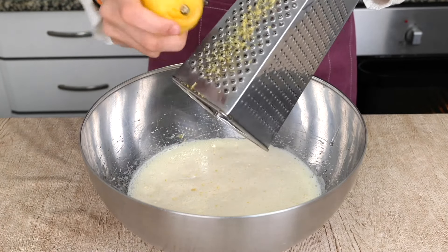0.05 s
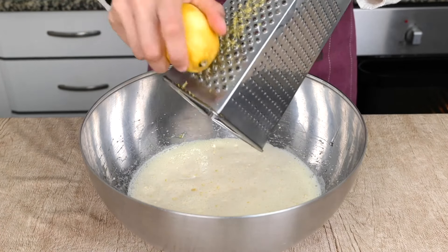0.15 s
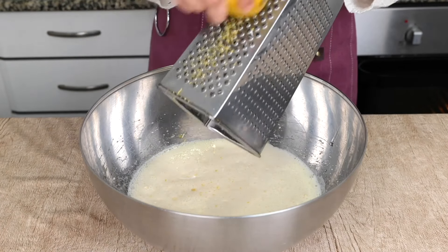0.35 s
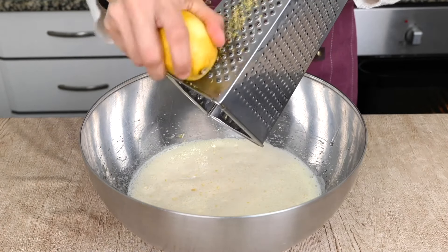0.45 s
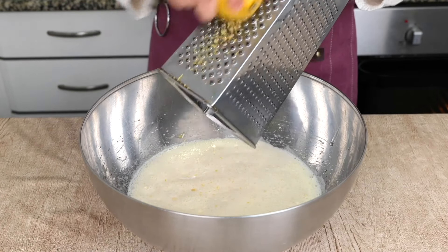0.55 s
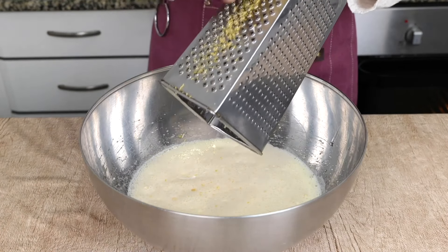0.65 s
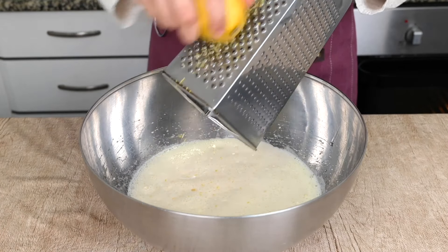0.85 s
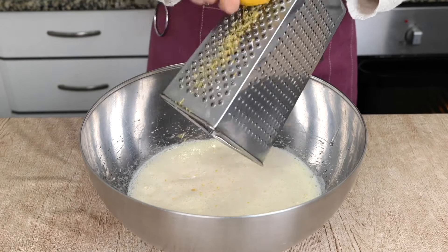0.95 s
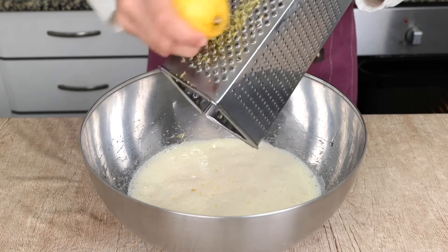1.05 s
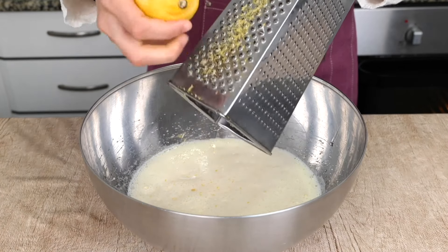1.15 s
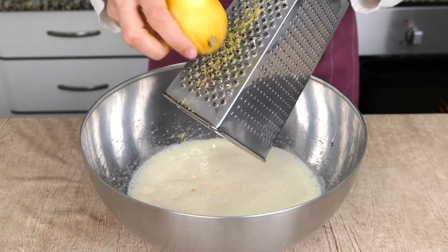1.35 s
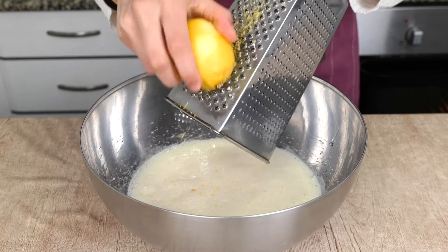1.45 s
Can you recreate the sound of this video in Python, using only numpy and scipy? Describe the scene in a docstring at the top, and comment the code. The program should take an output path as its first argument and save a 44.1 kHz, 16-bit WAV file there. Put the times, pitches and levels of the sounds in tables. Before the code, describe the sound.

A lemon rasps up and down a metal box grater in five quick strokes.

```python
"""Grating lemon peel

A lemon is rubbed five times up and down a steel box grater held over a bowl in a kitchen; lighter
brushes come before and after. The teeth tear the peel in dense tiny snaps, impulses that rasp and
drive the steel's modes. The handling rumbles, an appliance drones behind, and all of it is heard
on the left side, through a hissing microphone and a noise suppressor."""
import sys
import numpy as np
from scipy import signal
from scipy.fft import rfft, irfft
from scipy.io import wavfile
from scipy.ndimage import uniform_filter1d

SR = 44100
rng = np.random.default_rng(int(sys.argv[2]) if len(sys.argv) > 2 else 0)


def transcribe(u):
    """Save the signal u as a 16-bit wav file named by the first command-line argument.

    u: samples, shape (n,) or (channels, n), limited to [-1, 1]; the rate is SR.
    q: integer samples, one column per channel.
    """
    v = np.clip(np.atleast_2d(u).T, -1, 1)
    q = np.round(v * 32767).astype(np.int16)
    wavfile.write(sys.argv[1], SR, q)


N = 66150
T = np.arange(N) / SR


def grater():
    """Source and filter: friction scales one train of snaps, which excites every part of the steel."""
    force = friction()
    peel, sheet, box, rim = force * snaps()
    return rasp(peel, force[0]) + body(sheet, box) + teeth(peel) + steel_modes(sheet, box, rim)


def friction():
    """Power addition: arched strokes and brief brushes sum to envelopes for rasp, sheet, box and rim."""
    # strokes of the lemon (start [s], rise [s], fall [s], rasp [dB], sheet [dB], box [dB], rim [dB])
    strokes = [(0.232, 0.049, 0.089, -0.5, 1, 3, -10), (0.378, 0.074, 0.066, -2, 2, 4.5, -9),
               (0.541, .058, 0.087, 0.5, 2.5, 4.5, -6), (0.701, 0.081, 0.059, -1.5, 1.5, 6, 4),
               (0.854, 0.053, 0.093, -0.5, 3.5, 6, 5.5)]
    # light brushes (start [s], hold [s], decay [s], rasp [dB], sheet [dB], box [dB], rim [dB])
    brushes = [(0.205, 0.0061, 0.14, -23.5, -16.5, -4, -18), (1.097, 0.016, 0.02, -21.5, -12.5, -5, -10),
               (1.455, 0.02, 0.047, -21, -14, -3.5, -2.5)]
    leave_at_s, leave_decay_s, brush_rise_s = 1.0174, 0.03, 0.0031
    touch = np.clip((T - strokes[0][0]) / strokes[0][1], 0, 1)
    contact = touch * np.exp(-np.maximum(T - leave_at_s, 0) / leave_decay_s)
    power = (amp(-11.5) * contact) ** 2  # friction that remains at the turns
    for start, rise, fall, *levels in strokes:
        phase = np.interp(T, [start, start + rise, start + rise + fall], [0, np.pi / 2, np.pi])
        power = power + (amp(levels)[:, None] * np.sin(phase)) ** 2
    for start, hold, decay, *levels in brushes:
        onset = np.clip((T - start) / brush_rise_s, 0, 1)
        flick = onset * np.exp(-np.maximum(T - start - hold, 0) / decay)
        power = power + (amp(levels)[:, None] * flick) ** 2
    return np.sqrt(power)


def snaps(per_second=9000):
    """Shot noise: the peel tears in random impulses, uneven in size and clumped as rows of teeth bite."""
    spread_db = 2 * np.minimum(rng.exponential(1, N), 3)
    clump_db = 1.25 * np.clip(wander(seconds=0.012), -2, 2)
    return amp(spread_db + clump_db) * rng.choice([-1, 1], N) * (rng.random(N) < per_second / SR)


def rasp(peel, force):
    """Nonlinear excitation: the snaps are heard directly, and a harder bite adds a brighter fizz."""
    # dry rasp of the peel (frequency [Hz], spectral level [dB])
    rasp_spectrum = [(50, -55.5), (300, -35.5), (1000, -17.5), (2500, -6.5), (3900, -6), (5200, -4),
                     (6300, -1.5), (7400, -2.5), (8700, 0.5), (10000, -5), (11500, -7.5), (12800, -30.5),
                     (15500, -55)]
    # fizz of a hard bite (frequency [Hz], spectral level [dB])
    fizz_spectrum = [(1000, -52), (9000, -14.5), (11500, 2.5), (13000, 5.5), (15500, -15)]
    fizz = amp(-50) * unit(colour(peel * force ** 0.8, fizz_spectrum))
    return amp(-33.5) * unit(colour(peel, rasp_spectrum)) + fizz


def body(sheet, box):
    """Modal overlap: crowded resonances merge into the ring of the sheet and the thud of the box."""
    # dense ring of the thin sheet (frequency [Hz], spectral level [dB])
    sheet_spectrum = [(60, -42.5), (220, -23.5), (330, -8), (560, -12.5), (820, -10), (1200, 1),
                      (1750, 0.5), (2150, 1.5), (2450, -6), (2850, 0.5), (3500, -6.5), (6000, -1.5),
                      (9000, -14), (13000, -37.5)]
    # hollow thud of the box (frequency [Hz], spectral level [dB])
    box_spectrum = [(150, -33.5), (240, -15), (305, 0), (370, -0.5), (450, -15), (800, -15), (1500, -29.5)]
    sheet_ring = amp(-33) * unit(colour(shimmer(sheet), sheet_spectrum))
    return sheet_ring + amp(-48.5) * unit(colour(shimmer(box), box_spectrum))


def shimmer(drive, patches=8, t60_s=0.055):
    """Superposition: each patch of steel answers its own snaps with its own short, dense ring."""
    patch, t = rng.integers(0, patches, N), T[:SR // 4]
    decay = amp(-60 * t / t60_s)
    return sum(ring(drive * (patch == k), rng.standard_normal(len(t)) * decay) for k in range(patches))


def steel_modes(sheet, box, rim):
    """Normal modes: sheet, box and rim each ring at their own clear natural frequencies."""
    # modes of the sheet (frequency [Hz], level [dB])
    sheet_modes = [(1330, -48), (1394, -49), (1507, -49), (1701, -51), (1895, -47), (2046, -50),
                   (2164, -47), (2229, -51), (2482, -52), (2606, -50), (2676, -49), (2950, -46),
                   (3112, -53), (3413, -56), (3714, -54)]
    # low modes of the box (frequency [Hz], level [dB])
    box_modes = [(312.2, -52), (398.4, -47), (489.9, -52), (662.1, -51)]
    # modes of the rim (frequency [Hz], level [dB])
    rim_modes = [(936.7, -56), (1066, -44), (1104, -48)]
    return (amp(-0.3) * modes(sheet, sheet_modes, t60_at_1khz_s=0.24)
            + amp(1) * modes(box, box_modes, t60_at_1khz_s=0.15)
            + amp(-3.5) * modes(rim, rim_modes, t60_at_1khz_s=0.28))


def modes(drive, table, t60_at_1khz_s):
    """Damped oscillators: higher modes die sooner; a snap pushes each either way, by where it lands."""
    t = T[:SR // 2]
    out = np.zeros(N)
    for hz, db in table:
        t60_s = t60_at_1khz_s / (hz / 1000) ** 0.45
        response = amp(-60 * t / t60_s) * np.sin(2 * np.pi * hz * t)
        out += amp(db) * unit(ring(drive * rng.choice([-1, 1], N), response))
    return out


def teeth(peel):
    """Resonance: the punched teeth colour the snaps with short bright rings."""
    # resonances of the teeth (frequency [Hz], bandwidth [Hz], peak level [dB])
    peaks = [(5020, 130, 0), (5610, 41, 0), (6270, 260, 0), (6890, 160, -2), (8340, 45, -3),
             (8540, 170, -1), (11100, 150, -9), (11700, 230, -12)]
    return amp(-52.5) * sum(amp(db) * np.sqrt(width / 100) * unit(resonance(peel, hz, width))
                            for hz, width, db in peaks)


def catches():
    """Stick-slip friction: the peel catches in brief rough squeaks of narrow-band noise."""
    # squeaks (start [s], length [s], frequency [Hz], bandwidth of each filter pass [Hz], level [dB])
    squeaks = [(0.203, 0.0071, 2650, 800, -45), (0.268, 0.0083, 2545, 220, -30.5),
               (0.392, 0.031, 2537, 260, -29.5)]
    out = np.zeros(N)
    for start, length, hz, width, db in squeaks:
        squeak = resonance(resonance(rng.standard_normal(N), hz, width), hz, width)
        out += amp(db) * unit(squeak) * np.sin(np.pi * np.clip((T - start) / length, 0, 1))
    return out


def handling():
    """Amplitude-modulated noise: a dull rumble swells and sinks as the grater is pushed about."""
    # envelope of the rumble (time [s], level [dB])
    envelope = [(0.24, -66), (0.36, -43.5), (0.446, -43.5), (0.498, -30), (0.632, -38), (0.662, -60.5),
                (0.718, -64), (0.752, -63), (0.86, -64.5), (0.892, -47.5), (1.022, -68.5), (1.04, -74)]
    # colour of the rumble (frequency [Hz], spectral level [dB])
    spectrum = [(20, -23.5), (38, -12), (52, -8.5), (85, -6.5), (140, -7), (210, -13), (400, -22),
                (1000, -72.5)]
    times, db = np.transpose(envelope)
    return amp(-2.5 + np.interp(T, times, db, left=-90, right=-90)) * noise(spectrum)


def kitchen(x, build_up_s=0.0053):
    """Reverberation: a short diffuse tail that lasts longest in the middle frequencies."""
    # decay of the room (frequency [Hz], reverberation time T60 [s])
    decay_times = [(150, .25), (1500, 0.31), (6000, 0.3), (14000, .2)]
    hz, t, bands = signal.stft(rng.standard_normal(SR // 2), SR, nperseg=256)
    decay = amp(-60 * t / read(decay_times, hz)[:, None])
    tail = signal.istft(bands * decay, SR, nperseg=256)[1]
    tail *= np.minimum(T[:len(tail)] / build_up_s, 1)
    return ring(x, tail / np.linalg.norm(tail))


def appliance(waver=0.083, hum_fade_db_per_s=5, drone_fade_db_per_s=4):
    """Line and continuous spectra: wavering hum tones over a hollow drone, both slowly fading."""
    # hum tones (frequency [Hz], level [dB])
    tones = [(183.0, -67), (296.1, -59), (484.5, -63), (576.0, -66), (699.8, -68)]
    # hollow drone (frequency [Hz], spectral level [dB])
    spectrum = [(18, -80.5), (30, -50.5), (177, -13), (215, -26.5), (295, -1.5), (327, -16.5), (383, -6.5),
                (457, -9.5), (564, -12.5), (661, -18), (722, -17.5), (907, -31.5), (2000, -54),
                (2600, -84.5), (4400, -120)]
    hum = np.zeros(N)
    for hz, db in tones:
        level = amp(db) * (1 + waver * wander(seconds=0.17))
        hum += level * np.sin(2 * np.pi * (hz * T + rng.random()) + waver * wander(seconds=0.06))
    drone = amp(-52.5 - drone_fade_db_per_s * T) * noise(spectrum)
    return drone + amp(3 - hum_fade_db_per_s * T) * hum


def hiss():
    """Self-noise: the microphone adds a steady broadband floor."""
    # microphone hiss (frequency [Hz], spectral level [dB])
    spectrum = [(100, -7), (1000, 6), (2500, 0), (3500, -3.5), (5000, -1), (6500, -6), (8700, -3.5),
                (11000, -10.5), (15000, -17)]
    return amp(-66) * noise(spectrum)


def suppress(x, floor_db=-8):
    """Spectral gating: bands weak in the left channel are turned down, which shortens the ringing."""
    # threshold of the noise suppressor (frequency [Hz], equivalent white-noise level [dB])
    threshold = [(400, -48), (1500, -49), (3000, -47.5), (9000, -56), (11500, -50), (13500, -55)]
    hz, _, bands = signal.stft(x, SR, nperseg=512, noverlap=384)
    power = abs(bands[0]) ** 2 * 512 / 1.5  # unit white noise reads 1
    power = uniform_filter1d(uniform_filter1d(power, size=5, axis=0), size=3, axis=1)
    excess = power / amp(read(threshold, hz))[:, None] ** 2
    gain = amp(floor_db / (1 + excess ** 2))
    return signal.istft(bands * gain, SR, nperseg=512, noverlap=384)[1][:, :N]


def amp(db):
    """Decibel scale: level to amplitude ratio."""
    return 10 ** (np.asarray(db) / 20)


def unit(x):
    """Normalisation to an rms of 1."""
    return x / np.sqrt(np.mean(x ** 2) + 1e-20)


def read(points, hz):
    """Interpolation of a table on a log-frequency axis."""
    frequencies, values = np.transpose(points)
    return np.interp(np.log(hz + 1), np.log(frequencies + 1), values)


def ring(x, response):
    """Convolution with an impulse response."""
    return signal.fftconvolve(x, response)[:N]


def colour(x, points, size=4096):
    """Minimum-phase filtering: a causal response with the given spectrum."""
    log_gain = np.log(amp(read(points, abs(np.fft.fftfreq(size, 1 / SR)))))
    transfer = np.exp(np.conj(signal.hilbert(log_gain)))
    return ring(x, np.fft.ifft(transfer).real[:size // 2])


def resonance(x, hz, width):
    """Second-order resonator: passes one band of x."""
    return signal.lfilter(*signal.iirpeak(hz, hz / width, fs=SR), x)


def low_cut(x, hz):
    """Fourth-order high-pass filtering."""
    return signal.sosfilt(signal.butter(4, hz, "highpass", fs=SR, output="sos"), x)


def noise(points):
    """Spectral shaping: steady noise with the given spectrum."""
    gain = amp(read(points, np.fft.rfftfreq(N, 1 / SR)))
    return unit(irfft(rfft(rng.standard_normal(N)) * gain, N))


def wander(seconds):
    """Low-pass noise: a smooth random drift on the given time scale."""
    gain = np.exp(-(np.fft.rfftfreq(N, 1 / SR) * seconds) ** 2)
    return unit(irfft(rfft(rng.standard_normal(N)) * gain, N))


def scene():
    """Superposition: grater, room and background sum at one microphone, wired to the left channel."""
    steel = low_cut(grater() + catches(), hz=243)  # the small box radiates little bass
    mix = steel + amp(-10.5) * kitchen(steel) + handling() + appliance() + hiss()
    return 2 * np.array([mix, amp(-68) * mix])


def record(dry):
    """Band limiting and gating: the microphone's low cut, the noise suppressor, a steep treble cut."""
    gated = suppress(low_cut(dry, hz=54))
    low_pass = signal.firwin(511, cutoff=15600, window=("kaiser", 9), fs=SR)
    return signal.oaconvolve(gated, low_pass[None], "same")


dry = scene()
out = record(dry)
transcribe(out)
```